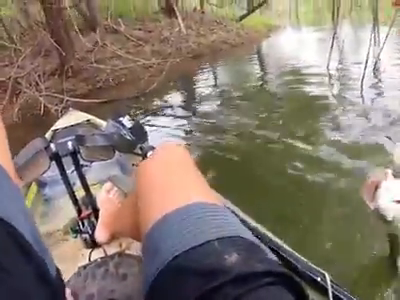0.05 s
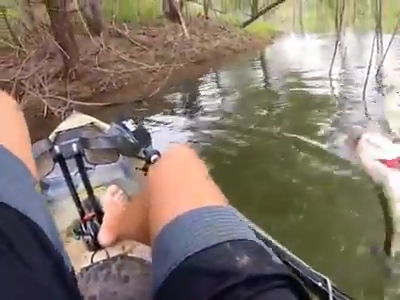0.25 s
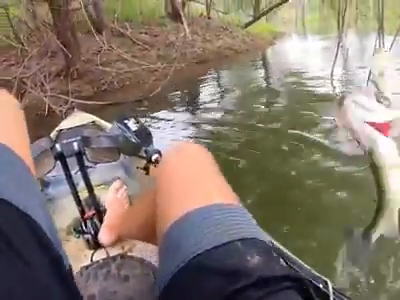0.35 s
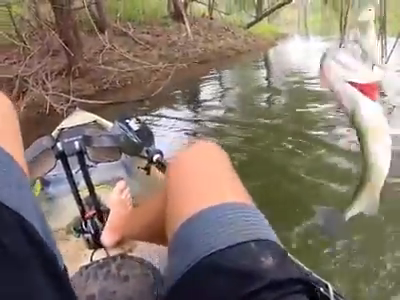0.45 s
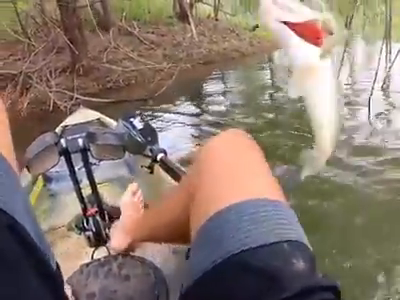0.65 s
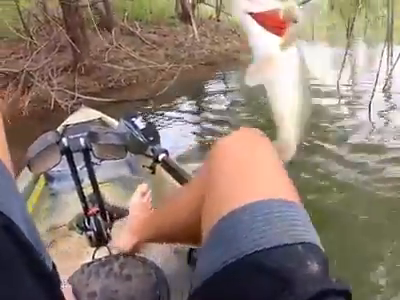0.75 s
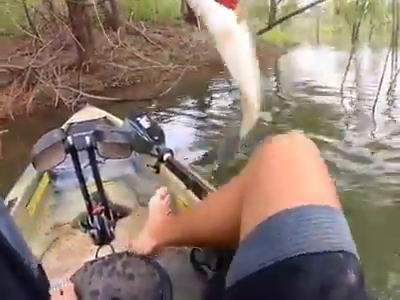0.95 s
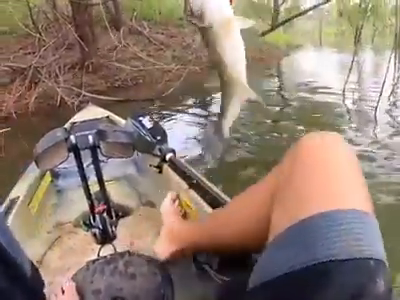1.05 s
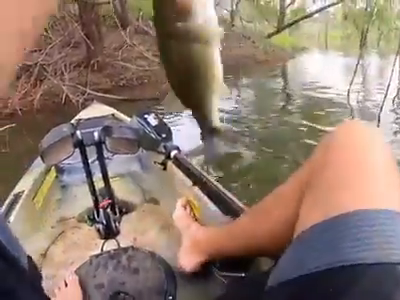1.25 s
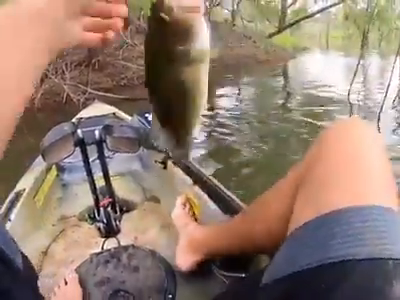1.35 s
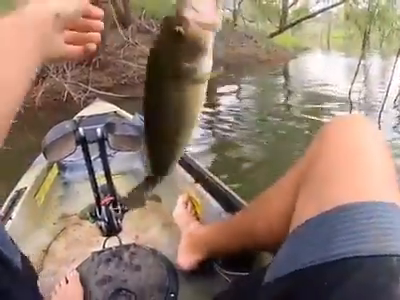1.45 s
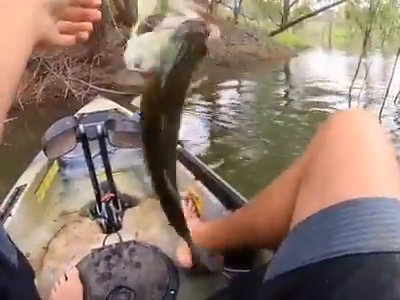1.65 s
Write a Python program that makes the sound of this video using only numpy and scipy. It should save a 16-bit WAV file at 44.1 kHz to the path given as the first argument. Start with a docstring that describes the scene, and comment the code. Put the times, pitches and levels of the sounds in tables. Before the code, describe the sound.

Hollow knocks and thumps on a plastic kayak hull, with light water spray and clicks.

```python
"""Landing a fish in a kayak

An angler swings a fish aboard a plastic kayak, heard from the seat. Feet and gear strike the hollow hull:
each impact excites dense wall modes, a clack, and then the low modes, a boom. The fish flicks a short
spray of droplets, and small hard parts of the tackle tick. Underneath are the rumble of the rocking boat,
lapping water, a soft rustle, a thin insect and one faint far bird."""
import sys
import numpy as np
from scipy import signal
from scipy.fft import rfft, irfft
from scipy.io import wavfile
from scipy.ndimage import uniform_filter1d

SR = 44100
rng = np.random.default_rng(int(sys.argv[2]) if len(sys.argv) > 2 else 0)


def bounce(signal):
    """Save signal as a 16-bit WAV file at the path given by the first command-line argument."""
    frames = np.transpose(np.atleast_2d(signal))
    limited = np.clip(frames, -1, 1)
    pcm = np.round(limited * 32767).astype(np.int16)
    wavfile.write(sys.argv[1], SR, pcm)


N = 74970
BIN_HZ = np.arange(N // 2 + 1) * SR / N


def undb(db):
    return 10 ** (np.asarray(db) / 20)


def unit_rms(x):
    return x / np.sqrt(np.mean(x ** 2))


def since(start):
    """Time elapsed since an onset, zero before it."""
    return np.maximum(np.arange(N) / SR - start, 0)


def decay(t, t60):
    """Free decay of a damped vibration: 60 dB in t60 seconds."""
    return np.exp(-np.log(1000) * t / t60) * (t > 0)


def swell(start, rise, t60):
    """Linear rise, then exponential decay."""
    return np.minimum(since(start) / rise, 1) * undb(-60 * since(start + rise) / t60)


def colour(x, spectrum):
    """Spectral shaping by (f/Hz, relative level/dB) points, scaled to unit RMS."""
    hz, db = np.array(spectrum).T
    gain = undb(np.interp(np.log(BIN_HZ + 1e-9), np.log(hz), db))
    return unit_rms(irfft(rfft(x) * gain, N))


def drift(per_s):
    """Random modulation: straight lines between random values, at unit RMS."""
    hold = int(SR / per_s)
    steps = np.repeat(rng.standard_normal(N // hold + 1), hold)
    return unit_rms(uniform_filter1d(steps, hold)[:N])


def resonance(hz, width):
    """Response to white noise of a steep-sided resonance of given relative width."""
    shape = 1 / (1 + (np.log((BIN_HZ + 1) / hz) / width) ** 2 / 2) ** 2
    return unit_rms(irfft(rfft(rng.standard_normal(N)) * shape, N))


def patter(per_s=16000, spread_db=1.5):
    """Shot noise: tiny independent impacts of unequal size."""
    hits = rng.random(N) < per_s / SR
    return hits * rng.standard_normal(N) * undb(spread_db * rng.exponential(size=N))


# spectra of the boat's sway, its rumble and the rustle: f/Hz, relative level/dB
SWAY_SPECTRUM = [(5, -6.5), (13, -27), (24, -9.5), (45, -29), (100, -47), (400, -100)]
RUMBLE_SPECTRUM = [(20, -28), (45, 3), (85, 0.5), (150, -5.5), (300, -14), (700, -23), (2000, -41)]
RUSTLE_SPECTRUM = [(300, 9), (1000, 1), (2500, -3.5), (4500, -1.5), (6500, 0.5), (8500, 1.5),
                   (10500, -10.5), (13000, -4.5), (15500, -28)]
# background envelopes: t/s, rumble level/dB, rustle level/dB, rustle treble gain/dB
BACKGROUND_LEVELS = [(0, -48.5, -70, -7), (0.118, -61.5, -68.5, -24), (.21, -62.5, -63, -19),
                     (.3, -51, -55, -13), (.5, -46.5, -55.5, -1.5), (0.701, -51, -57, -14),
                     (.85, -47, -55.5, 0.5), (.97, -48.5, -58.5, 0), (1.06, -51, -59.5, 3.5),
                     (1.3, -46, -60.5, -1), (1.472, -60, -60, 7.5), (1.581, -58.5, -59.5, 2.5),
                     (1.7, -53.5, -59, 7)]


def boat_and_rustle(treble_hz=8400, flicker_db=1.45):
    """Amplitude-modulated noise: the rocking boat rumbles, while clothes and ripples rustle."""
    t = since(0)
    times, *levels = np.array(BACKGROUND_LEVELS).T
    rumble_db, rustle_db, treble_db = (np.interp(t, times, db) for db in levels)
    sway = undb(-50.5) * colour(rng.standard_normal(N), SWAY_SPECTRUM)
    rumble = undb(rumble_db) * colour(rng.standard_normal(N), RUMBLE_SPECTRUM)
    grain = colour(patter(), RUSTLE_SPECTRUM)
    dull = irfft(rfft(grain) / (1 + (BIN_HZ / treble_hz) ** 8), N)
    treble = undb(treble_db) * (grain - dull)
    rustle = undb(rustle_db + flicker_db * drift(per_s=39.75)) * (dull + treble)
    return sway + rumble + rustle


# laps of water: t/s, level/dB, f/Hz, T60/s
WATER_LAPS = [(-.005, -48.5, 438, 0.15), (0.656, -53.5, 523, 0.19), (.83, -55.5, 825, 0.14),
              (1.185, -41.5, 670, 0.15), (1.641, -46.5, 332, 0.17)]


def laps(rise_s=0.019):
    """Cavity resonance: water gulps softly in a pocket under the hull."""
    return sum(undb(db) * resonance(hz, width=0.17) * swell(start, rise_s, t60)
               for start, db, hz, t60 in WATER_LAPS)


# buzzes of an insect: start t/s, end t/s, level/dB
INSECT_BUZZES = [(.05, 0.212, -72), (0.656, 0.742, -64)]


def insect(edge_s=0.018):
    """Gated narrow-band noise: a thin, high buzz comes and goes on the bank."""
    t = since(0)
    envelope = sum(undb(db) * np.clip(np.minimum(t - start, end - t) / edge_s + 0.5, 0, 1)
                   for start, end, db in INSECT_BUZZES)
    return envelope * resonance(hz=9500, width=0.085)


# flicks of spray: t/s, level/dB, rise time/s, T60/s, spectral tilt/(dB per octave)
SPRAY_FLICKS = [(0.227, -47.5, 0.0011, 0.16, -1), (0.734, -45, 0.005, 0.19, -3),
                (.7570, -33.5, 0.0018, 0.048, 3), (0.773, -34, 0.011, 0.069, 0.5),
                (0.802, -49, 0.025, 0.095, 5), (1.026, -50.5, 0.047, 0.06, 5),
                (1.174, -50.5, 0.023, 0.45, -1), (1.2124, -39, 0.0032, 0.028, 3.5)]
# spectrum of droplet impacts: f/Hz, relative level/dB
SPRAY_SPECTRUM = [(1000, -17), (2500, -13.5), (4000, -17), (6500, -7), (9000, -8), (12000, -11.5),
                  (15500, -26)]


def spray(clump_db=1.5):
    """Superposed droplet impacts make bursts of shot noise; finer spray is brighter."""
    out = np.zeros(N)
    drops = patter() * undb(clump_db * drift(per_s=400))  # droplets land in clumps
    for start, db, rise, t60, tilt in SPRAY_FLICKS:
        spectrum = [(hz, level + tilt * np.log2(hz)) for hz, level in SPRAY_SPECTRUM]
        out += undb(db) * swell(start, rise, t60) * colour(drops, spectrum)
    return out


# spectrum of the dense wall modes that make the clack: f/Hz, relative level/dB
WALL_SPECTRUM = [(150, -42), (300, 1), (480, 2.5), (750, 0), (1000, 0), (1450, -8), (1900, -9.5),
                 (2600, -14), (3500, -12), (4300, -15), (5300, -15), (9000, -15), (15000, -39)]


def wall_bands(lowest_hz=180, count=14):
    """Modal overlap: crowded wall modes merge into noise, given as half-octave (f/Hz, noise) bands."""
    spectrum = rfft(colour(rng.standard_normal(N), WALL_SPECTRUM))
    half_octaves = 2 * np.log2((BIN_HZ + 1) / lowest_hz)
    bands = []
    for k in range(count):
        triangle = np.maximum(1 - abs(half_octaves - k), 0)
        bands.append((lowest_hz * 2 ** (k / 2), irfft(spectrum * triangle, N)))
    return bands


def build_up(t, hz, cycles=0.62):
    """Onset transient: a mode grows with a time constant proportional to its period."""
    return 1 - np.exp(-t * hz / cycles)


def contact_gain(hz, cutoff_hz):
    """Finite contact time acts as a low-pass filter: a softer blow is duller."""
    return 1 / np.sqrt(1 + (hz / cutoff_hz) ** 3)


# low hull modes (the strong, quickly damped one is the floor's thud): f/Hz, relative level/dB, T60/s
HULL_MODES = [(68, -15.5, 0.37), (128.5, -3.5, 0.13), (149.2, -7.5, 0.264), (250.5, -7.5, 0.28),
              (258, -10, 0.2), (293.3, 4, 0.074), (308.1, -4, 0.18), (346.9, -4.5, 0.15),
              (433.2, -16.5, 0.3), (534, -19.5, 0.27), (648.5, -17, 0.099), (795, -20.5, 0.22),
              (920, -26, 0.22), (1029, -29, 0.12), (1208, -21.5, 0.17)]
# blows: t/s, boom level/dB, clack level/dB, contact cut-off f/Hz, bass gain/dB, spot f/Hz, spot level/dB
HULL_BLOWS = [(.2280, -34, -23.5, 4100, 4, 1725, -29), (0.248, -54, -29.5, 5070, -5, 3060, -48),
              (0.259, -44, -37, 4060, 27, 3600, -42.5), (.2930, -13, -12.5, 2780, -4.5, 3530, -34),
              (.3280, -33, -38, 2500, 5, 3530, -59), (0.3865, -18, -18, 2720, 1, 1990, -31),
              (.4210, -33.5, -32.5, 2030, 2, 1230, -51), (.4590, -23.5, -26.5, 3140, -1.5, 1920, -45.5),
              (0.513, -35.5, -34.5, 2374, 9, 770, -53), (0.547, -38.5, -38, 708, 2.5, 1140, -52),
              (.6150, -35.5, -38.5, 1320, -9, 1260, -50), (.7380, -29.5, -39.5, 1330, 2.5, 1070, -34.5),
              (1.0020, -45.5, -33, 1480, 5, 2950, -45.5), (1.069, -39.5, -36, 1200, 5.5, 604, -47),
              (1.1610, -21, -22.5, 3240, -8.5, 2020, -30.5), (1.1880, -34, -32.5, 1800, 4, 505, -24.5)]


def hull(flex=0.0183, detune=0.0029, place_spread_db=2, bass_hz=189):
    """Impact excitation: each blow cracks, rings the struck spot and the wall, and the low modes boom."""
    out, bands = np.zeros(N), wall_bands()
    # the flexing plastic makes each mode waver in pitch
    clocks = [np.cumsum(1 + flex * drift(per_s=35)) / SR for _ in HULL_MODES]
    for start, boom_db, clack_db, cutoff_hz, bass_db, spot_hz, spot_db in HULL_BLOWS:
        for (hz, db, t60), clock in zip(HULL_MODES, clocks):
            place, mistune = rng.standard_normal(2)
            travel_s = 0.002945 * np.sqrt(300 / hz)  # bending waves disperse: lows arrive later
            t = since(start + travel_s)
            shelf_db = bass_db / (1 + (hz / bass_hz) ** 6)
            gain = undb(boom_db + db + place_spread_db * place + shelf_db) * contact_gain(hz, cutoff_hz)
            phase = 2 * np.pi * hz * (1 + detune * mistune) * (clock - clock[np.argmax(t > 0)])
            out += gain * build_up(t, hz) * decay(t, t60) * np.sin(phase)
        t = since(start)
        crack = undb(-0.5) * decay(t, t60=0.012)  # first burst at the point of contact
        for hz, noise in bands:
            ring = decay(t, t60=0.088 * (1000 / hz) ** 0.43)  # higher modes die sooner
            gain = undb(clack_db) * contact_gain(hz, cutoff_hz)
            out += gain * noise * build_up(t, hz) * (ring + crack) / 2
        spot = undb(spot_db) * resonance(spot_hz, width=0.17)
        out += spot * build_up(t, spot_hz) * decay(t, t60=0.031)
    return out


# ticks of the tackle: t/s, level/dB, f/Hz
TACKLE_TICKS = [(0.2289, -33.5, 5200), (0.3564, -40, 6300), (0.5144, -31, 5980), (0.6764, -42.5, 4640),
                (0.8257, -35, 7000), (0.9133, -35.5, 6060), (1.128, -30, 7170), (1.3503, -45, 6000),
                (1.3565, -21.5, 6340), (1.36, -39.5, 6750), (1.3722, -42.5, 6230), (1.4968, -22, 6290),
                (1.5943, -27, 6230)]
# modes of a small hard part: ratio to the tick's frequency, relative level/dB, T60/s
TACKLE_MODES = [(.62, -26.5, 0.018), (.84, -7, 0.0043), (1.002, 1, 0.0078), (1.11, -18, 0.0083),
                (1.399, -22, 0.006)]


def tackle(rise_s=0.0001):
    """Damped free vibration: small hard parts ring for milliseconds, with a thin rattle behind."""
    out = np.zeros(N)
    for start, db, hz in TACKLE_TICKS:
        t = since(start)
        ring = sum(undb(mode_db) * decay(t, t60) * np.sin(2 * np.pi * hz * ratio * t)
                   for ratio, mode_db, t60 in TACKLE_MODES)
        rattle = undb(-13) * resonance(hz, width=0.22) * decay(t, t60=0.02)
        out += undb(db) * (ring + rattle) * (1 - np.exp(-t / rise_s))
    return out


# heels and weight pressing on the floor: t/s, level/dB, f/Hz
HEEL_THUMPS = [(.238, -25, 126.8), (0.257, -28.5, 173), (.545, -50, 95.3), (.740, -34.5, 73),
               (1.007, -33, 114.7), (1.044, -35.5, 78.4), (1.205, -28, 129.6)]
# skin and cloth sliding on the plastic: t/s, level/dB, centre f/Hz, T60/s
FLOOR_SCUFFS = [(0.549, -48.5, 1070, 0.079), (1.084, -41, 467, 0.11), (1.116, -41.5, 600, 0.023),
                (1.398, -45.5, 970, 0.085), (1.402, -65, 1880, 0.028), (1.539, -53, 620, 0.027)]


def feet():
    """Soft impact and friction: bare feet thump the floor at a low pitch and scuff along it."""
    thumps = sum(undb(db) * swell(start, rise=0.0037, t60=0.14) * np.sin(2 * np.pi * hz * since(start))
                 for start, db, hz in HEEL_THUMPS)
    scuffs = sum(undb(db) * swell(start, rise=0.005, t60=t60) * resonance(hz, width=0.42)
                 for start, db, hz, t60 in FLOOR_SCUFFS)
    return thumps + scuffs


# pitch contour of the bird's whistle: t/s, f/Hz
BIRD_GLIDE = [(0.593, 4300), (.612, 3950), (0.631, 3490), (.668, 3300)]


def bird(peak_db=-60.5):
    """Frequency modulation of a pure tone: one faint falling whistle from the bank."""
    t = since(0)
    times, hz = np.array(BIRD_GLIDE).T
    progress = np.clip((t - times[0]) / (times[-1] - times[0]), 0, 1)
    arch = np.sqrt(np.abs(np.sin(np.pi * progress)))
    phase = 2 * np.pi * np.cumsum(np.interp(t, times, hz)) / SR
    return undb(peak_db) * arch * np.sin(phase)


def scene():
    """Linear superposition: the pressures of all sources add in one channel."""
    return (hull() + feet() + tackle() + spray() + laps() + bird() + insect() + boat_and_rustle())[None]


def record(dry):
    """Band limiting: a steep low-pass filter removes the treble above 15.9 kHz."""
    return signal.sosfilt(signal.ellip(8, 0.2, 70, 15900, fs=SR, output="sos"), dry)


dry = scene()
out = record(dry)
bounce(out)
```